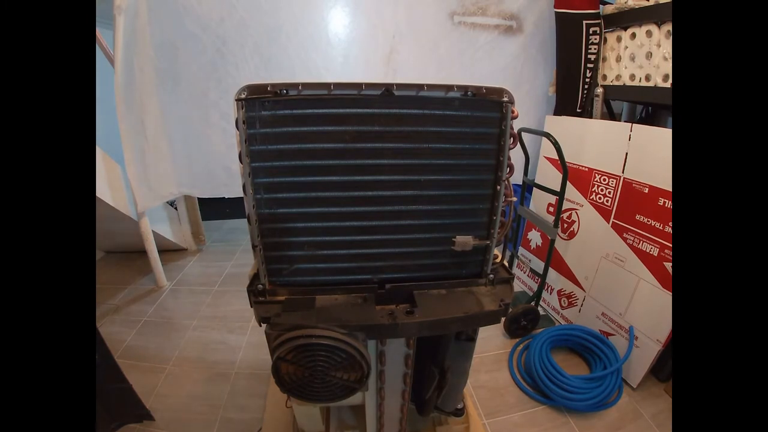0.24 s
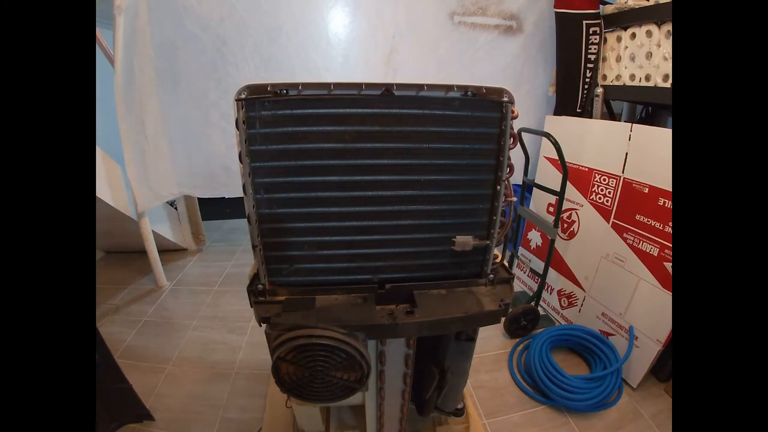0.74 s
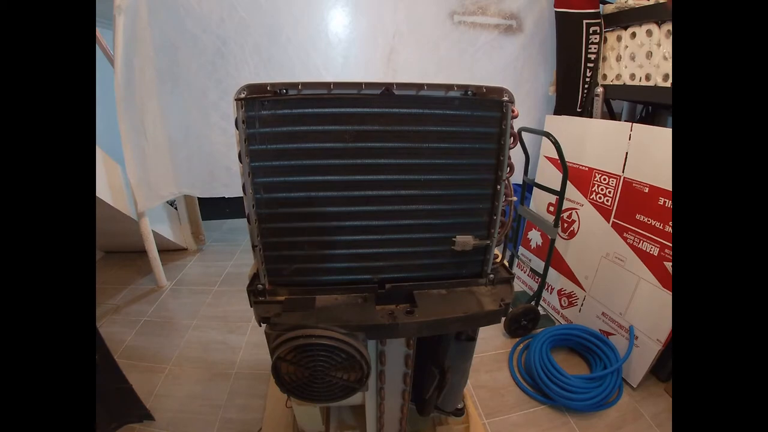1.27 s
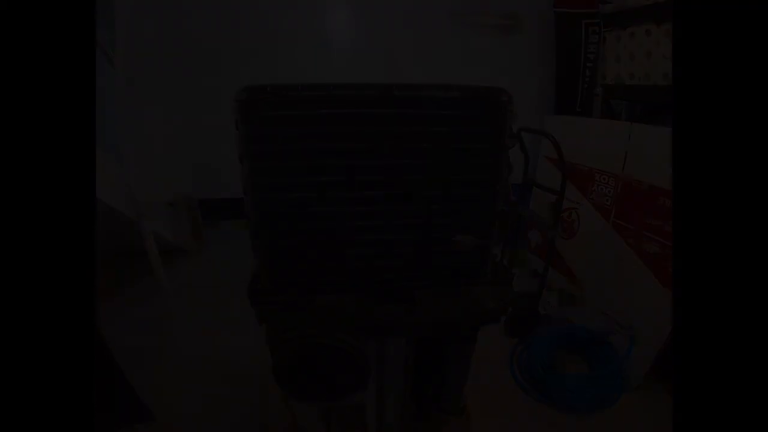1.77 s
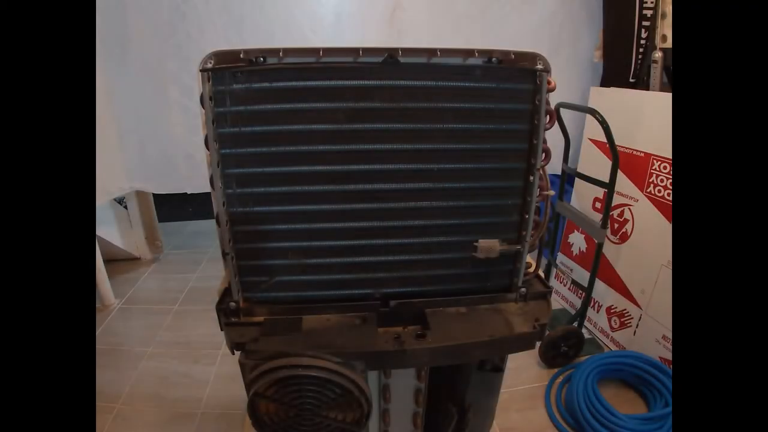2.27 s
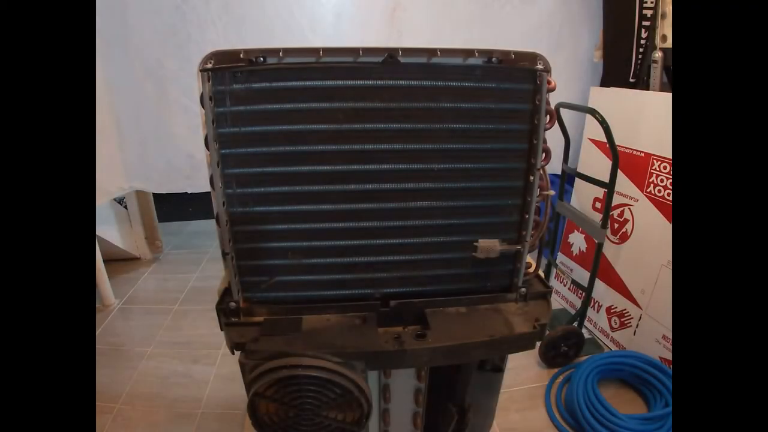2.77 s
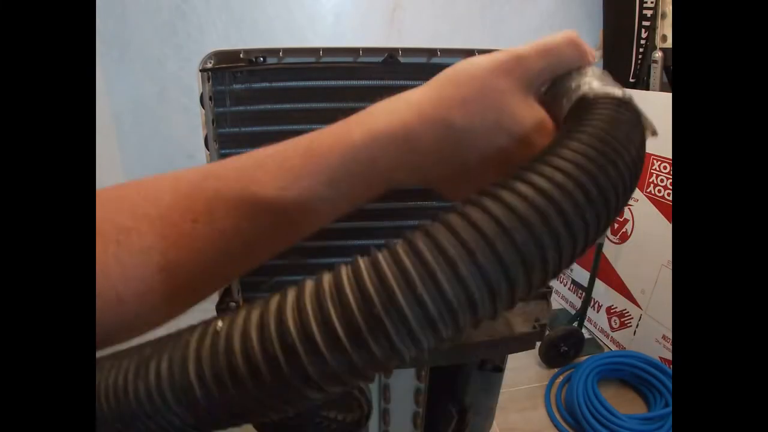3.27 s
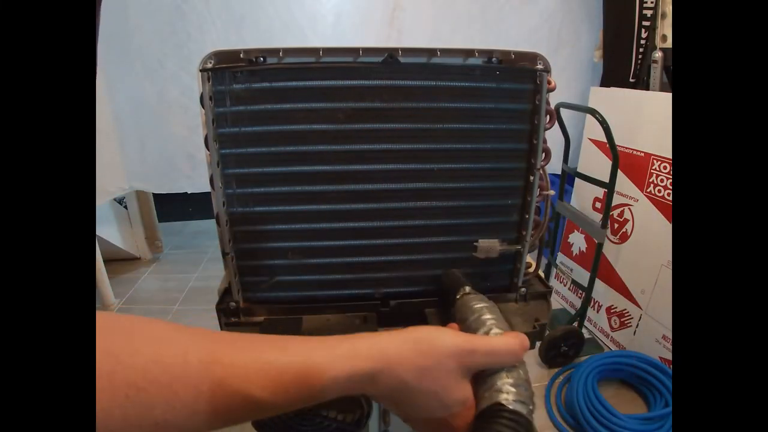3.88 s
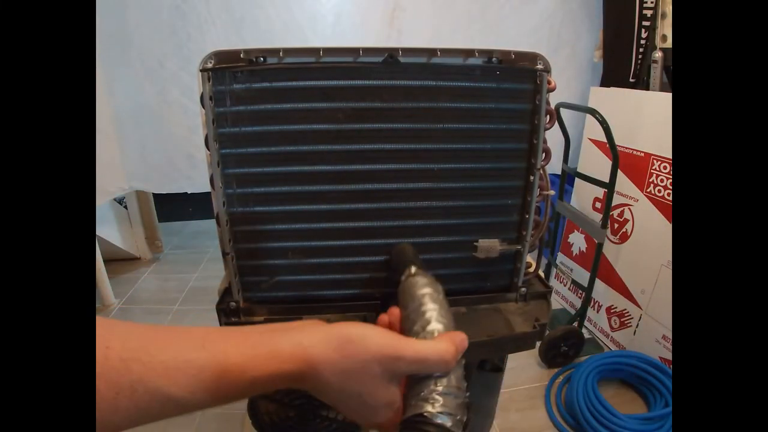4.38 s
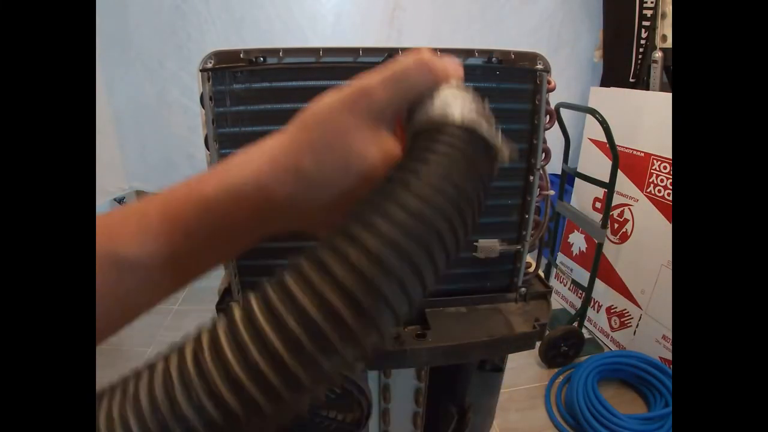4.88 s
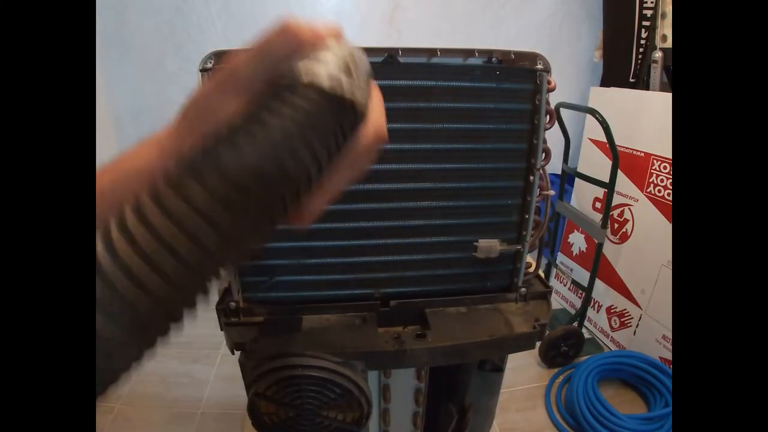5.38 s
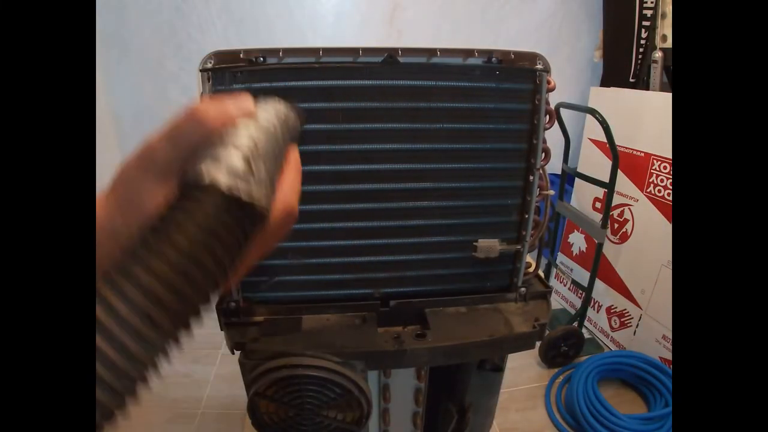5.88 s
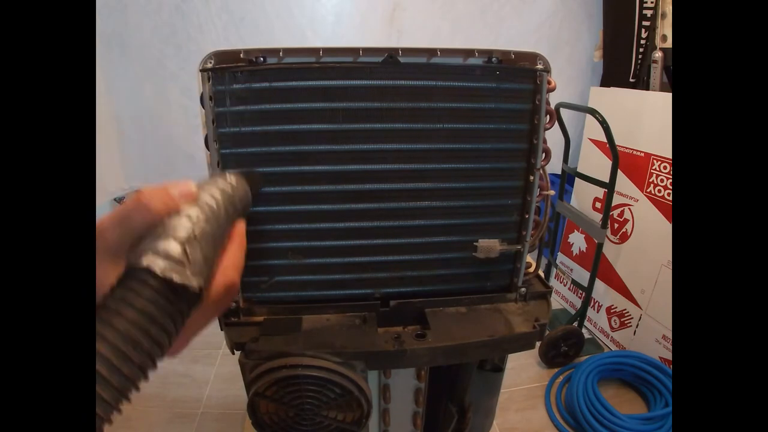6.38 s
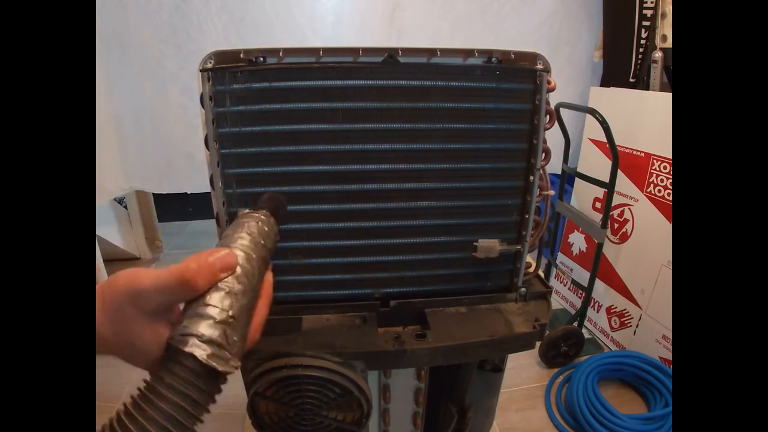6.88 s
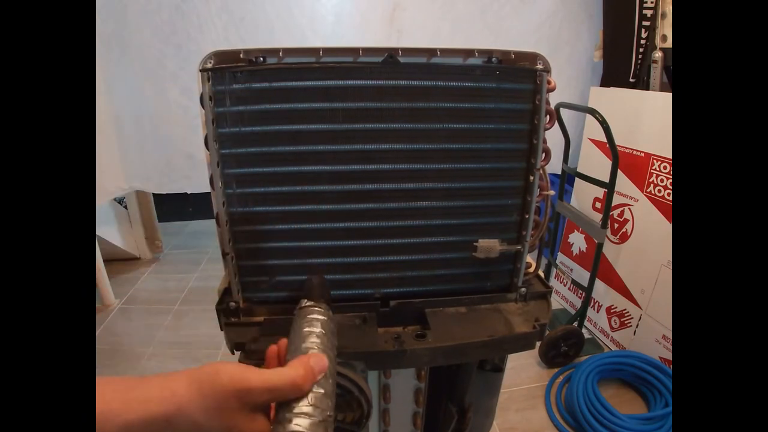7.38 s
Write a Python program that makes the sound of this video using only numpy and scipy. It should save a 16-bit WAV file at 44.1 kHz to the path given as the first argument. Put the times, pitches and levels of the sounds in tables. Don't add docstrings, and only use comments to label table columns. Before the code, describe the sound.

Handling comes first: soft rubbing over mains hum, a heavy hollow bang with a hard room echo, then very close rasping, creaking and clicking on the microphone's plastic housing. After a button click, a wet-dry vacuum surges on and holds a piercing, wavering whine with broadband air hiss until the sound stops. Dull ribbed-hose bumps are buried underneath, followed by two short hollow nozzle knocks.

```python
import sys
import numpy as np
from scipy import signal
from scipy.fft import rfft, irfft
from scipy.io import wavfile
from scipy.ndimage import uniform_filter1d

SR = 44100
rng = np.random.default_rng(int(sys.argv[2]) if len(sys.argv) > 2 else 0)


def ratio_of_db(decibels):
    return 10 ** (np.asarray(decibels, float) / 20)


def dump(signal):
    limited = np.clip(np.atleast_2d(signal).T, -1, 1)
    pcm = np.round(limited * 32767).astype(np.int16)
    wavfile.write(sys.argv[1], SR, pcm)


N = 336924
T = np.arange(N) / SR
HZ = np.fft.rfftfreq(N, 1 / SR) + 1e-3

# f/Hz, level/dB
HUM_LINES = [(59.2, -57.5), (172.3, -64), (296.1, -69), (409.1, -81), (527.6, -86.5), (829.0, -80)]
# f/Hz, level/dB
FAST_HUM_LINES = [(239.5, -64), (684, -73.5), (713, -80), (1190, -75)]
# f/Hz, density/dB per Hz
HUSH_COLOUR = [(12, -43), (20, -21.5), (61, -9), (73, -7.5), (92, -27), (134, -14), (174, -1), (227, -17.5),
               (266, -16.5), (295, -8), (328, -16.5), (1020, -34), (5120, -55.5), (11000, -53),
               (14300, -87), (22000, -120)]
HUSH_DB = -51 - 6.0
DISSOLVE_S = (1.67, 2.27)
TOP_HZ = 15720

# peak t/s, rise/s, fall/s, rub level/dB, housing ring level/dB
FINGER_RUBS = [(.016, 0.029, 0.087, -70, -94), (.255, 0.21, .26, -57, -71), (.485, 0.012, 0.68, -63, -72),
               (1.33, 0.028, 0.028, -45, -48), (1.4, 0.033, .2, -75, -62), (1.47, 0.076, .012, -72, -59),
               (1.52, 0.029, .08, -59, -56), (1.574, 0.074, .03, -61, -69),
               (1.612, 0.03, 0.066, -62, -49.5), (1.7, 0.055, 0.084, -63, -62),
               (1.814, 0.0098, 0.011, -68, -75), (1.839, .004, .013, -55, -62),
               (1.91, 0.0092, 0.043, -51, -53), (2.014, .08, 0.055, -70, -75),
               (2.156, 0.012, 0.046, -62, -72), (2.215, 0.014, 0.033, -45, -61),
               (2.349, 0.014, 0.016, -66, -77)]
# f/Hz, density/dB per Hz
RUB_COLOUR = [(180, -52.5), (300, -19), (915, -15.5), (1230, -10), (2000, -9.5), (2170, -12), (3350, -12),
              (4670, -10), (9240, -15.5), (16000, -68)]
# t/s, peak level/dB, housing ring level/dB, centre f/Hz, tail level/dB
HOUSING_CLICKS = [(1.2975, -40, -40, 5000, -5), (1.472, -46, -52, 4600, -14), (1.507, -41, -43, 11000, -12),
                  (1.571, -29.5, -42, 7500, -24), (1.5958, -49, -34, 4330, -14),
                  (1.6257, -42, -44, 11500, -10), (1.681, -46, -48, 3390, -14),
                  (1.718, -36, -45, 8000, -19), (1.734, -37, -63, 8000, -30), (1.747, -46, -55, 11000, -26),
                  (1.7621, -21, -11.5, 3300, -20), (1.7716, -44, -52, 5370, -24),
                  (1.8063, -43, -58, 5260, -14), (1.835, -36, -35, 4200, -6), (1.903, -38, -36, 4100, -2),
                  (2.1266, -33.5, -45, 4600, -16), (2.152, -49, -68, 2670, -5)]
# f/Hz, level/dB, t60/s
HOUSING_MODES = [(1100, -15, .03), (1295, -1, 0.06), (1342, 6.5, 0.06), (1800, -24, .034), (2600, 1, 0.02),
                 (3130, -0.5, 0.016), (5260, -6, 0.018), (8400, -3, 0.01)]
# t/s, peak level/dB, centre f/Hz, tail/s, tail level/dB
BUTTON = [
    (2.2, -33.5, 12000, .12, 6.5),
    (2.2002, -33, 2700, 0.1, -4),
    (2.201, -52, 1400, 0.11, 6),
    (2.322, -59, 6000, 0.077, 6),
]
# t/s, peak level/dB
FINGER_TOCKS = [
    (1.4716, -54),
    (1.571, -40),
    (1.6814, -54),
    (1.7177, -40),
    (1.8063, -50),
    (1.904, -44),
]
# t/s, pressure, width/s
SHOVES = [
    (1.34, -.008, .0074),
    (1.38, 0.0078, 0.012),
    (1.399, -0.018, 0.0034),
    (1.521, .075, 0.0041),
    (1.537, -0.018, .0046),
    (1.569, -0.072, 0.0094),
    (1.616, -.024, .0075),
    (1.645, .1, 0.0082),
    (1.7, -.01, 0.025),
]
# peak t/s, rise/s, fall/s, level/dB
GRIP_SHIFTS = [
    (1.33, 0.033, 0.057, -41),
    (1.512, .06, .2, -53),
    (1.592, .03, 0.28, -47),
    (1.852, 0.15, 0.019, -46.5),
    (1.905, .01, 0.058, -42),
    (2.1, .3, .5, -73),
]
# peak t/s, rise/s, fall/s, level/dB
SKIN_FIZZ = [
    (1.33, 0.048, .03, -62),
    (1.512, .012, .02, -64),
    (1.585, .02, .03, -70),
    (1.812, .01, .015, -72),
    (2.0, .07, .12, -70),
    (2.12, 0.028, .08, -73),
]
CLICK_TAIL_S = 0.032
RUB_REST_DB, RING_REST_DB = -81.5, -88
STROKE_BEND = 1.18

# f/Hz, width/Hz, peak t/s,
# rise/s, fall/s, level/dB
NARROW_SWELLS = [(404, 40, .66, 0.12, 0.18, -39), (693, 64, 0.693, .09, .06, -39),
                 (735, 70, 0.767, .045, .03, -40), (985, 60, .61, .05, .08, -43),
                 (1900, 50, .67, .06, 0.044, -49.5), (1890, 40, .822, .025, .04, -48),
                 (620, 600, .26, 0.15, .16, -62.5), (8700, 900, .25, .1, .12, -68),
                 (8000, 2500, 0.015, .008, .04, -64), (8500, 1500, .92, .03, .04, -70),
                 (9000, 2000, .45, .02, .03, -72), (485, 45, 2.385, 0.013, .08, -42)]
# t/s, peak level/dB, room share/dB
BOX_BANGS = [
    (0.4876, -41, -7.5),
    (0.489, -36, -9.5),
    (0.494, -41, -9),
    (0.536, -19, -32),
    (0.5377, -6, -11),
    (.578, -24.5, -5),
]
# f/Hz, level/dB, t60/s
BOX_MODES = [(226, 2.5, .5), (313, 9, 1.2), (406, 3.5, 2), (487, -4.5, 1.5), (558, 14, 0.69), (680, 8, 1),
             (760, 3.5, 1), (988, 1, 1), (1446, 11, 0.23), (1880, 8.5, 0.35), (2360, -12.5, 0.33),
             (4800, -2, 0.29), (5830, -13.5, 0.33)]
# t/s, body level/dB, grit level/dB
BOX_ROCKING = [
    (.61, -48.5, -40),
    (.72, -34.5, -57),
    (.78, -34.5, -59.5),
    (.818, -46, -46),
    (.938, -48, -54.5),
]
ROCK_RISE_S, ROCK_FALL_S = 0.1, 0.095
# f/Hz, t60/s
ROOM_T60 = [(60, 0.83), (170, 0.86), (500, 0.53), (1000, 0.3), (2500, 0.49), (5000, 0.33), (11000, 0.18)]
# f/Hz, density/dB per Hz
ROOM_COLOUR = [(24, -47.5), (40, -20.5), (101, -31), (151, -11.5), (276, -14), (402, -11.5), (663, -13),
               (2200, -21), (2650, -27), (3750, -31), (4200, -28), (7930, -24.5), (14100, -52.5),
               (16000, -88)]

# t/s, rasp level/dB, edge squeal level/dB, housing ring level/dB
NAIL_SCRAPE = [(1.296, -61, -70, -60), (1.298, -38, -52, -39), (1.303, -35, -46, -33),
               (1.307, -36, -46, -38), (1.312, -36, -46, -24), (1.317, -38, -44, -38),
               (1.324, -31, -35, -29), (1.333, -31, -33, -32), (1.339, -29, -32, -24),
               (1.344, -35, -35, -33), (1.351, -41, -37, -29), (1.356, -60, -58, -50),
               (1.366, -75, -75, -62)]
# f/Hz, width/Hz, level/dB
RASP_MODES = [(1900, 500, -10), (2490, 500, -6), (4600, 500, -0.5), (5620, 540, -2), (6760, 520, -2),
              (7430, 400, -5), (8370, 700, -5), (9770, 900, -8)]
# t/s, peak level/dB, f/Hz,
# t60/s
SHORT_PINGS = [(1.7619, -13.5, 3390, .006), (1.762, -19, 3120, 0.015), (1.835, -46, 600, .01),
               (1.8063, -50, 1000, .008), (1.773, -39, 500, .01), (2.2015, -45, 660, 0.037),
               (2.4, -43, 1550, .06), (2.2, -38, 2550, .06), (2.298, -62, 2300, .008),
               (2.297, -62, 11000, .004), (1.7622, -22, 4950, .007), (1.7617, -29, 8730, .007),
               (1.7617, -33, 6600, .006), (1.7718, -20, 5300, .0035), (1.7455, -48, 5600, .006),
               (1.7515, -52, 3400, .006), (1.134, -62, 7600, .003), (1.134, -68, 5200, .004),
               (1.681, -44, 1260, .02)]
# peak t/s, rise/s, fall/s, level/dB
SKIN_CHIRPS = [
    (1.816, .012, .005, -52),
    (1.57, .05, .02, -62),
    (2.03, .05, .03, -70),
]
# peak t/s, half length/s, level/dB, f/Hz, bend/Hz per s
SHELL_CREAKS = [(1.394, 0.013, -56, 1220, -2000), (1.428, .008, -58, 1330, 3000),
                (1.454, .022, -58, 1485, 3500), (1.455, .02, -58, 1160, -3000), (1.504, .006, -53, 1260, 0),
                (1.513, .008, -54, 1350, 4000), (1.512, .008, -57, 1800, 9000),
                (1.56, .025, -62, 1940, 7000), (1.598, .006, -47, 1420, 0), (1.607, .008, -55, 1100, 0),
                (1.631, .007, -53, 1080, 6000), (1.636, .014, -54, 1500, 2000), (1.652, .01, -59, 1020, 0),
                (1.666, .008, -55, 1310, -3000), (1.695, .007, -58, 1320, 0), (1.711, .005, -57, 1310, 0),
                (1.828, .006, -62, 1330, 0), (1.846, .006, -62, 1310, 0), (1.927, .007, -56, 1370, 4000),
                (1.95, .008, -60, 1350, 9000), (1.962, .006, -60, 1400, 0), (1.975, .008, -63, 1320, 3000)]

# t/s, f/Hz
BLADE_PITCH = [(2.5, 1546), (2.63, 1545), (2.75, 1561), (2.92, 1558), (3.04, 1551), (3.22, 1562),
               (3.8, 1557), (4.3, 1563), (4.5, 1560), (4.62, 1566), (5.05, 1562), (5.8, 1567), (6.65, 1566),
               (7.03, 1558), (7.2, 1569), (7.64, 1562)]
# multiple of the pitch, level/dB
BLADE_OVERTONES = [(2, -18), (3, -40), (5, -44), (6, -41), (7, -59), (8, -42), (9, -56)]
# t/s, rate/Hz, depth/dB
THROB = [(2.95, 23.45, -24), (3.03, 21.26, -7.5), (3.1, 19.35, -8), (3.3, 16.76, -15.6),
         (3.5, 15.14, -11.6), (3.75, 11.54, -15.3), (4.0, 10.31, -14.7), (4.3, 8.14, -16.6),
         (4.6, 7.4, -18.6), (5.0, 6.33, -18.1), (5.4, 5.74, -19.2), (5.8, 6.63, -16.9), (6.2, 6.37, -17.4),
         (6.6, 7.33, -17.3), (7.0, 7.37, -15.8), (7.3, 7.06, -14.7), (7.64, 9.41, -17.4)]
# share of full speed, level/dB
SPIN_UP_RESPONSE = [(.2, -32), (.37, -27), (.454, -12), (.576, -15), (.66, -10), (.77, -10.5), (.835, -14),
                    (.875, -3.5), (.92, -.5), (.968, 2.5), (.981, -2.5), (.996, -3.2), (.9995, 0)]
THROB_START_TURN, SPEED_LEAD_RAD = .716, 2.2
SWITCH_ON_S, SPIN_FROM_S, SPIN_UP_S = 2.367, 2.352, .093
WHINE_DB, WHINE_SAG_DB_PER_S = -27.5, -0.38

# steady level/dB, drift/dB per s, inrush level/dB
AIR_REGISTERS = [
    (-39, 0.12, -54),
    (-38.5, 0.29, -36.5),
    (-45, 0.5, -37.5),
]
AIR_RISE_S = [
    .007,
    .018,
    .03,
]
# peak t/s, rise/s, fall/s
AIR_INRUSH = [
    (2.405, .035, .08),
    (2.45, .07, .16),
    (2.436, .055, .17),
]
# f/Hz, density/dB per Hz
AIR_COLOUR = [(30, -42), (95, -41.5), (190, -30), (240, -20.5), (400, -13.5), (500, -11), (620, -10),
              (1200, -9.5), (2300, -13.5), (3000, -16), (5000, -14), (7000, -17.5), (8600, -15.5),
              (10000, -17.5), (13500, -17), (16000, -24.5)]
# f/Hz, level/dB
STANDING_WAVES = [(420, -5), (550, 3.5), (635, -5), (990, 1), (1238, -2.5), (1395, 2.5), (1660, 0),
                  (1797, -2), (1900, 3), (2165, -3), (2245, 3.5), (2410, 1), (2560, -6.5), (2660, 2),
                  (2750, -4.5), (2850, 2.5), (2930, -1), (3200, -5.5), (3420, -3.5), (3600, 1), (4000, 3),
                  (4600, -7.5), (5150, -9), (5500, 1), (5690, -7), (5870, -6), (6950, 8), (7450, -6),
                  (7680, -8), (7900, 2), (8000, -1)]
STANDING_WIDTH_HZ = 49
# f/Hz, width/Hz, level/dB
DRUM_MODES = [(711, 17, -2), (905, 175, -10), (1026, 12, -9), (1150, 63, -9.5), (1453, 98, -4),
              (1715, 46, -7.5), (2049, 127, -5), (2670, 27, -9.5)]
# f/Hz, width/Hz, level/dB
DUCT_MODES = [(3690, 40, -3), (4300, 100, -4), (4690, 28, -4), (5070, 60, -4), (5290, 40, -2),
              (5800, 34, -8), (6000, 48, -4), (6350, 160, -5), (6640, 76, -2), (7320, 100, 0),
              (7520, 24, -4), (7810, 140, -4), (8240, 88, -4), (9390, 51, -7), (9580, 39, -9),
              (10100, 63, -9), (10900, 190, -9), (11700, 28, -10), (12500, 120, -8), (12900, 48, -12),
              (14100, 69, -9), (15400, 79, -14)]
# f/Hz, width/Hz, level/dB
WHISTLES = [(480, 6, -3), (7350, 30, -4), (14070, 40, -11)]

# t/s, peak level/dB
HOSE_BUMPS = [(4.584, -43), (4.796, -59), (4.908, -51), (5.051, -48), (5.172, -50), (5.315, -45),
              (5.437, -48), (5.585, -48), (5.734, -50.5), (5.908, -47), (6.055, -53), (6.208, -46),
              (6.364, -52), (6.498, -48)]
# t/s, peak level/dB, f/Hz
NOZZLE_KNOCKS = [
    (7.012, -26, 938),
    (7.424, -28, 970),
]


def level(x, db):
    return x * ratio_of_db(db) / np.sqrt(np.mean(x ** 2))


def read(rows, silent=-140):
    s, *columns = np.transpose(rows)
    return [np.interp(T, s, c, left=silent, right=silent) for c in columns]


def colour(table, hz=HZ):
    f, value = np.transpose(table)
    return np.interp(np.log(hz), np.log(f), value)


def noise(gain):
    return irfft(rfft(rng.standard_normal(N)) * gain, N)


def band(lo_hz, hi_hz, order=2):
    low_side = 1 + (lo_hz / HZ) ** (2 * order)
    high_side = 1 + (HZ / hi_hz) ** (2 * order)
    return 1 / np.sqrt(low_side * high_side)


def hump(hz, width):
    return 1 / (1 + (2 * (HZ - hz) / width) ** 2)


def walk(rate):
    k = int(SR / rate)
    steps = np.repeat(rng.standard_normal(N // k + 1), k)
    return 1.31 * uniform_filter1d(uniform_filter1d(steps, k), k)[:N]


def strokes(rows):
    out = 0
    for at, rise, fall, db in rows:
        away = np.where(T < at, (at - T) / rise, (T - at) / fall)
        out = out + ratio_of_db(db - 20 * away ** STROKE_BEND)
    return out


def impulse(at):
    return 1. * (np.arange(N) == int(at * SR))


def contact(t, push):
    return np.sin(np.pi / 2 * np.minimum(t / push, 1)) ** 2


def ring(x, modes, t60_scale=0.75, push=0.00037):
    t = T[:SR]
    body = sum(ratio_of_db(db - 60 * t / (t60 * t60_scale)) * np.sin(2 * np.pi * hz * t) for hz, db, t60 in modes)
    body = body * contact(t, push)
    return signal.fftconvolve(x, body / np.abs(body).max())[:N]


def burst(at, tail, gain, push=0.00046):
    t = np.clip(T - at, 0, 2)
    x = noise(gain) * contact(t, push) * ratio_of_db(-60 * t / max(tail, .002))
    return x / np.abs(x).max()


def hum(lines):
    return sum(np.sqrt(2) * ratio_of_db(db) * ratio_of_db(1.2 * walk(10)) * np.sin(2 * np.pi * hz * T) for hz, db in lines)


def basement():
    fade = np.clip((T - DISSOLVE_S[0]) / (DISSOLVE_S[1] - DISSOLVE_S[0]), 0, 1)
    slow_hum, fast_hum = hum(HUM_LINES), hum(FAST_HUM_LINES)
    hush = level(noise(ratio_of_db(colour(HUSH_COLOUR))), HUSH_DB)
    below_top = band(1, TOP_HZ, order=300)
    hiss = level(noise(band(200, 1500) * below_top), -72.0)
    hiss += level(noise(band(9000, 15500, order=4) * below_top), -77.5)
    return (slow_hum + hush) * (1 - fade) + fast_hum * fade + hiss * np.sqrt(fade)


def tick(at, db, hz, tail, tail_db):
    snap = burst(at, 0.0057, band(hz / 2.0, hz * 1.2, order=3) * band(1, hz * 2.8, order=5))
    return ratio_of_db(db) * (snap + ratio_of_db(tail_db) * burst(at, tail, band(hz / 1.12, hz * 1.02, order=3)))


def hand():
    out = sum(tick(*row) for row in BUTTON)
    strike = np.zeros(N)
    for at, db, ring_db, hz, tail_db in HOUSING_CLICKS:
        strike[int(at * SR)] = ratio_of_db(ring_db)
        out += tick(at, db, hz, CLICK_TAIL_S, tail_db)
    for at, db in FINGER_TOCKS:
        out += ratio_of_db(db) * burst(at, 0.02, band(300, 900, order=3), push=0.0011)

    rows, touching = np.array(FINGER_RUBS), T < SWITCH_ON_S
    rub = ratio_of_db(RUB_REST_DB) * touching + strokes(rows[:, :-1])
    rung = ratio_of_db(RING_REST_DB) * touching + strokes(np.delete(rows, -2, axis=1))
    grain = ratio_of_db(1.0 * walk(110))
    out += level(noise(ratio_of_db(colour(RUB_COLOUR)) * band(1300, 22000)), 0.46) * grain * rub
    shell = noise(hump(1310, 160) + .4 * band(1030, 1600, order=8))
    out += level(shell, -2.5) * ratio_of_db(2.5 * walk(110)) * rung

    out += level(noise(band(7000, 16000, order=3)), 0) * strokes(SKIN_FIZZ)
    out += level(noise(band(50, 300, order=3)), -3.5) * strokes(GRIP_SHIFTS)
    out += sum(p * np.exp(-.5 * ((T - at) / w) ** 2) for at, p, w in SHOVES)
    return out + ring(strike, HOUSING_MODES)


def narrow_swells():
    return sum(level(noise(hump(hz, w)), 0) * strokes([swell]) for hz, w, *swell in NARROW_SWELLS)


def tiled_room():
    centres = 45 * 2 ** np.arange(0, 8.6, .5)
    room = np.zeros(N)
    for f, t60 in zip(centres, colour(ROOM_T60, centres)):
        gain = ratio_of_db(colour(ROOM_COLOUR)) * band(f / 1.47, f * 1.33, order=3)
        room += noise(gain) * ratio_of_db(-60 * T / t60)
    t = T[:int(1.5 * SR)]
    room = room[:len(t)] * (1 - np.exp(-t / 0.001))
    return room / np.abs(room).max()


def rocking():
    body, grit = (strokes([(row[0], ROCK_RISE_S, ROCK_FALL_S, row[k]) for row in BOX_ROCKING]) for k in (1, 2))
    hollow = level(noise(band(400, 760, order=3)), -12.0)
    scuff = level(noise(band(1400, 7100, order=4) + 3.7 * band(1670, 2170, order=8)), -6.0)
    return hollow * body + scuff * grit


def bang():
    room = tiled_room()
    strike, crack = np.zeros(N), np.zeros(N)
    notches = (1 - 0.74 * hump(3750, 600)) * (1 - 0.51 * hump(2700, 600))
    for at, db, wet_db in BOX_BANGS:
        strike[int(at * SR)] = ratio_of_db(db + wet_db)
        sharp = burst(at, 0.006, band(930, 5800, order=7) * notches)
        crack += ratio_of_db(db) * (sharp + 0.33 * burst(at, 0.055, band(450, 2600, order=3), push=0.001))
    tail = signal.fftconvolve(strike, room)[:N]
    thud = ring(strike, [(150, 0, 0.17)], push=0.004)
    late = np.roll(strike, int(.026 * SR))
    thud += ratio_of_db(-13) * ring(late, [(157, 0, 1.15), (142, -2, 0.94)], push=.04)
    body = ring(strike, BOX_MODES, 0.26)
    return crack + rocking() + ratio_of_db(6) * tail + ratio_of_db(4.5) * thud + ratio_of_db(3.0) * body


def nail():
    rasp_db, squeal_db, ring_db = read(NAIL_SCRAPE)
    rasp = noise(sum(ratio_of_db(db) * hump(hz, w) for hz, w, db in RASP_MODES))
    out = level(rasp, 0) * ratio_of_db(rasp_db + 2 * walk(300))
    out += level(noise(hump(3960, 400) + 0.45 * hump(3300, 250)), 0) * ratio_of_db(squeal_db)
    shell = np.sin(2 * np.pi * np.cumsum(1270 + 50 * walk(150)) / SR)
    out += (shell + level(noise(hump(1330, 900) ** 2), -7)) * ratio_of_db(ring_db)
    out += level(noise(band(4000, 6300, order=6)), 0) * strokes(SKIN_CHIRPS)
    t = T[:2000]
    for at, db, hz, t60 in SHORT_PINGS:
        ping = ratio_of_db(db - 60 * t / t60) * np.sin(2 * np.pi * hz * t) * np.minimum(t / 0.00037, 1)
        out[int(at * SR):][:2000] += ping
    return out


def creaks():
    out, rough, t = np.zeros(N), walk(300), np.arange(-3000, 3000) / SR
    for at, half, db, hz, bend in SHELL_CREAKS:
        span = slice(int(at * SR) - 3000, int(at * SR) + 3000)
        phase = 2 * np.pi * (hz + bend * t / 2) * t + 0.67 * rough[span][::-1]
        swell = ratio_of_db(db - 8.9 * (t / half) ** 2 + 2.5 * rough[span])
        out[span] += swell * np.sqrt(2) * np.sin(phase)
    return out


def whine():
    speed = np.tanh(np.maximum(T - SPIN_FROM_S, 0) / SPIN_UP_S)
    db = WHINE_DB + WHINE_SAG_DB_PER_S * (T - 2.75) + np.interp(speed, *np.transpose(SPIN_UP_RESPONSE))
    rate, depth_db = read(THROB)
    throbbing = rate > 0
    turn = 2 * np.pi * (np.cumsum(np.maximum(rate, 0)) / SR + THROB_START_TURN)

    hz = speed * np.interp(T, *np.transpose(BLADE_PITCH))
    hz += 4.1 * np.cos(turn + SPEED_LEAD_RAD + 0.048 * (rate - 7)) * throbbing
    hz += 1.54 * walk(30)
    phase = 2 * np.pi * np.cumsum(hz) / SR

    flutter = ratio_of_db((0.4 + 3.3 * (1 - speed)) * walk(60))
    tone = (1 + ratio_of_db(depth_db) * np.cos(turn)) * flutter * np.sin(phase)
    lift_db = 4.0 * strokes([(2.83, 0.55, 0.34, 0)])
    upper = sum(ratio_of_db(d + 1.3 * walk(24.99) + lift_db) * np.sin(k * phase) for k, d in BLADE_OVERTONES)
    throb = np.exp(0.3 * np.clip((24 - rate) / 14, 0, 1) * throbbing * np.cos(turn - 2.3))
    tone += upper * throb * np.clip(hz / 1560, 0, 1) ** 32
    return np.sqrt(2) * ratio_of_db(db) * tone * np.clip((T - SWITCH_ON_S) / .016, 0, 1)


def air():
    echoes = ratio_of_db(-33.5) * rng.standard_normal(2000) * ratio_of_db(-60 * T[:2000] / 0.055)
    echoes[0] = 1
    standing_db = sum(db * hump(hz, STANDING_WIDTH_HZ) for hz, db in STANDING_WAVES)
    wash = ratio_of_db(colour(AIR_COLOUR) + standing_db) * rfft(echoes, N) * band(1, TOP_HZ, order=300)

    power = 0
    for table, top_db in ((DRUM_MODES, .1), (DUCT_MODES, -5.5), (WHISTLES, .1)):
        for hz, w, db in table:
            power = power + ratio_of_db(2 * (db + top_db)) * hump(hz, w) ** 2
    sing = np.sqrt(power)

    settled = np.clip((T - 2.45) / 0.16, 0, 1)
    low, high = band(1e-3, 2200, order=4), band(8600, 1e6, order=4)
    middle = np.sqrt(np.clip(1 - low ** 2 - high ** 2, 0, 1))
    gust = .5 * walk(12)
    out = np.zeros(N)
    for share, row, rise, inrush in zip((low, middle, high), AIR_REGISTERS, AIR_RISE_S, AIR_INRUSH):
        db, drift_db, inrush_db = row
        roar = level(noise(wash * share) + settled * noise(sing * share), 0.92)
        flicker = ratio_of_db(gust + 0.27 * walk(20) + .5 * walk(4.005))
        flow = 1 - np.exp(-np.maximum(T - SWITCH_ON_S, 0) / rise)
        loudness = ratio_of_db(db + drift_db * (T - 3.5)) + strokes([(*inrush, inrush_db)])
        out += roar * flicker * flow * loudness
    return out


def hose():
    out = np.zeros(N)
    for at, db in HOSE_BUMPS:
        out += ratio_of_db(db - 8) * burst(at, 0.2, band(190, 196, order=4) + 0.033 * band(40, 150), push=0.012)
        out += ratio_of_db(db - 3) * ring(impulse(at), [(180, 0, .2), (110, -13, .15)], push=.016)
    for at, db, hz in NOZZLE_KNOCKS:
        out += ratio_of_db(db) * ring(impulse(at), [(hz, 0, .06), (hz * 0.83, -4, .05)], push=0.0026)
    return out


def stray_treble(mono, count=30):
    side, other = np.zeros(N), rfft(np.roll(mono, 3000))
    for when, where in rng.random((count, 2)):
        at = (856 + 1024 * round(112 + 215 * when)) / SR
        lo_hz = 4000 + 9500 * where
        swell = np.cos(np.pi / 2 * np.clip((T - at) * SR / 1024, -1, 1))
        side += swell * irfft(other * (np.abs(HZ - lo_hz - 750) < 750), N)
    return ratio_of_db(-5.5) * side * np.array([[1], [-1]])


def scene():
    vacuum = whine() + air() + hose()
    mono = vacuum + bang() + hand() + basement() + nail() + narrow_swells() + creaks()
    return np.array([mono, mono])


def top_cut(x):
    return signal.sosfilt(signal.butter(12, 16990, fs=SR, output="sos"), x)


def record(dry):
    lowpass = signal.ellip(8, .2, 60, 16400, fs=SR, output="sos")
    heard = signal.sosfilt(lowpass, dry)
    return top_cut(heard + stray_treble(heard[0]))


dry = scene()
out = record(dry)
dump(out)
```